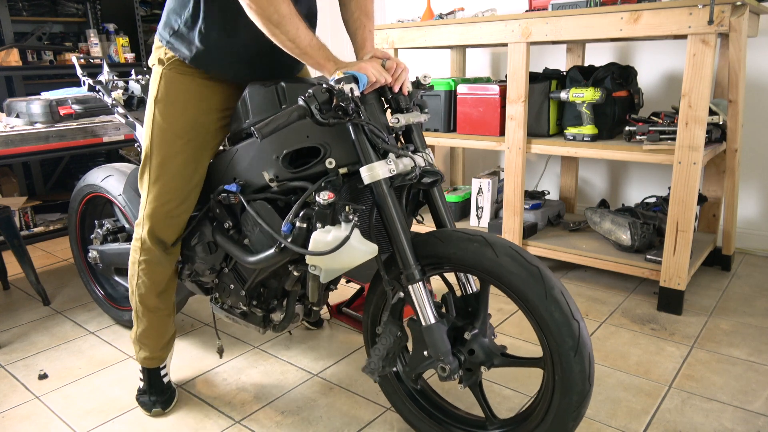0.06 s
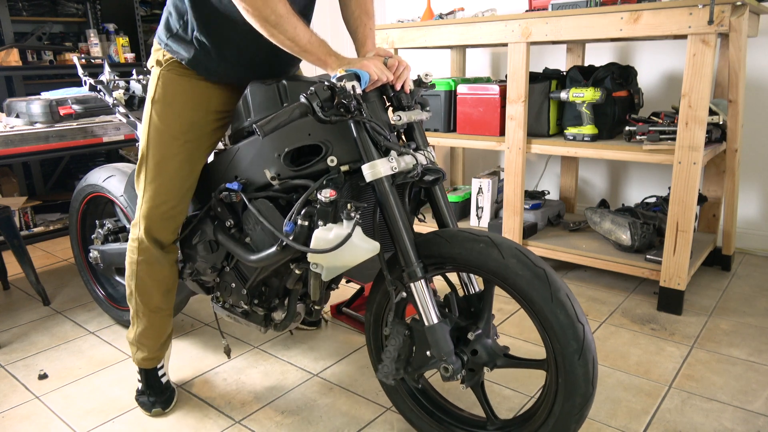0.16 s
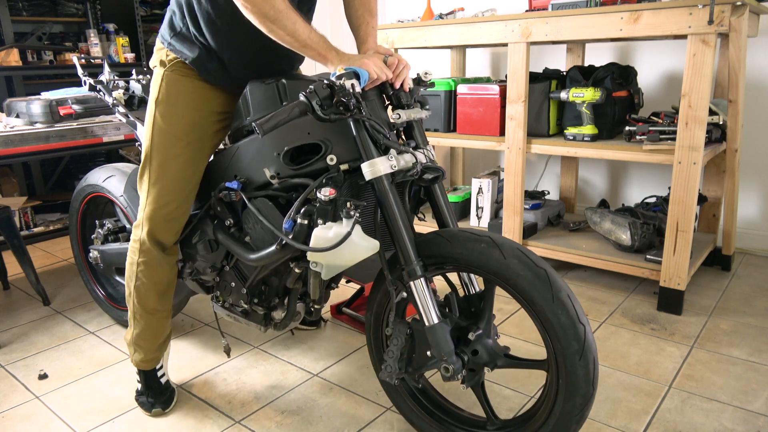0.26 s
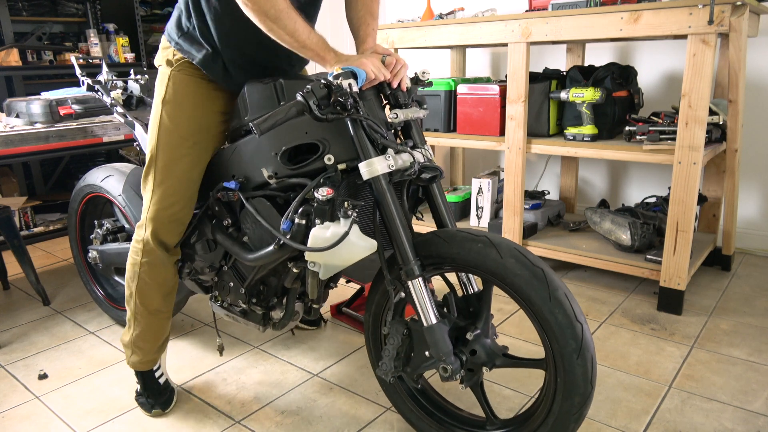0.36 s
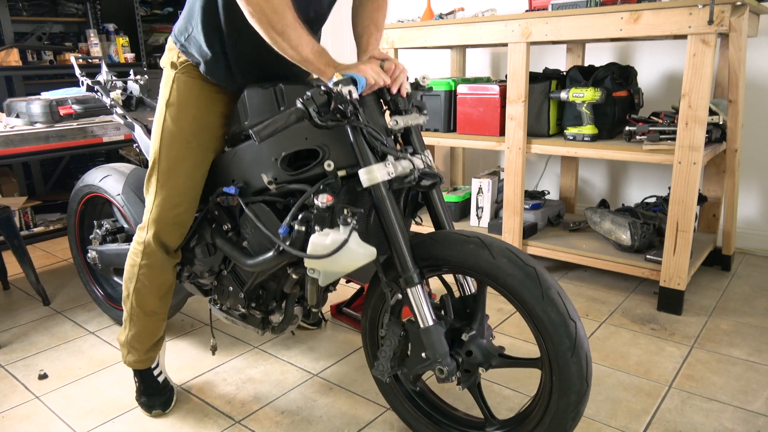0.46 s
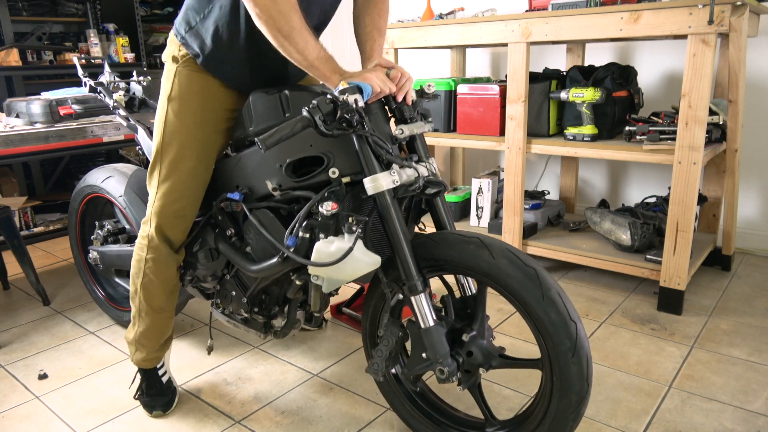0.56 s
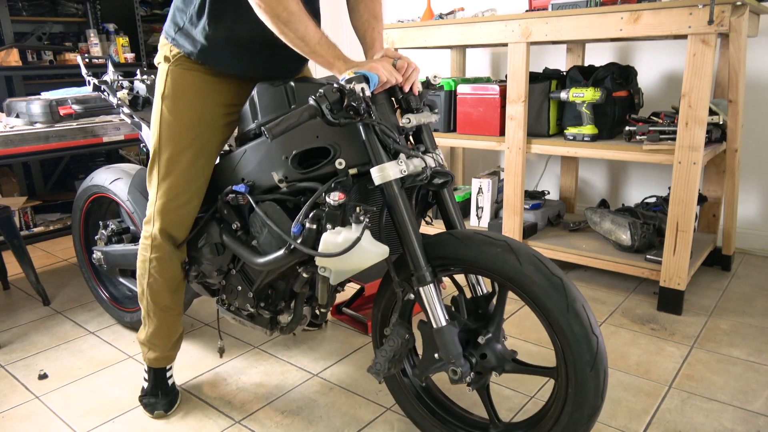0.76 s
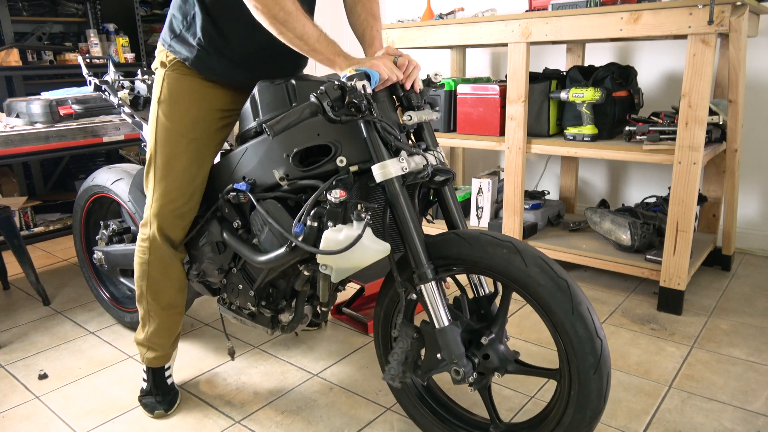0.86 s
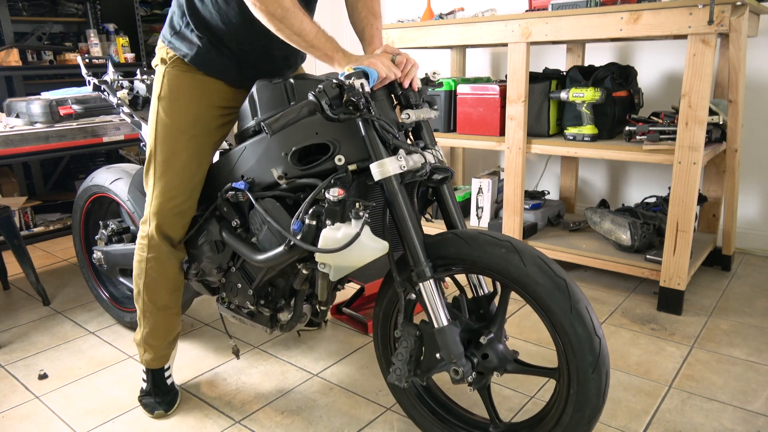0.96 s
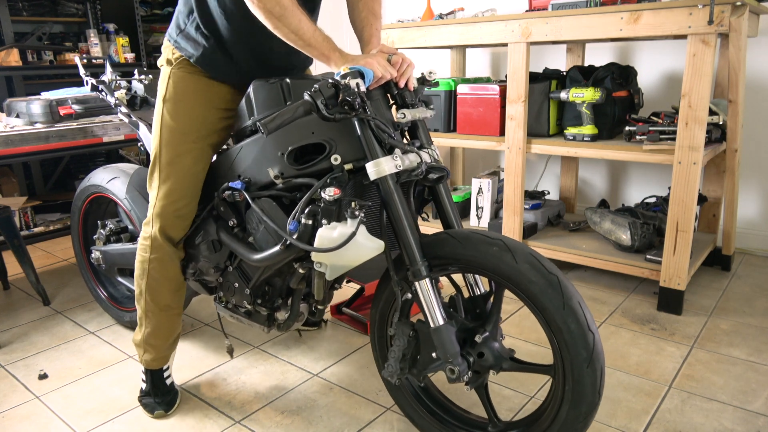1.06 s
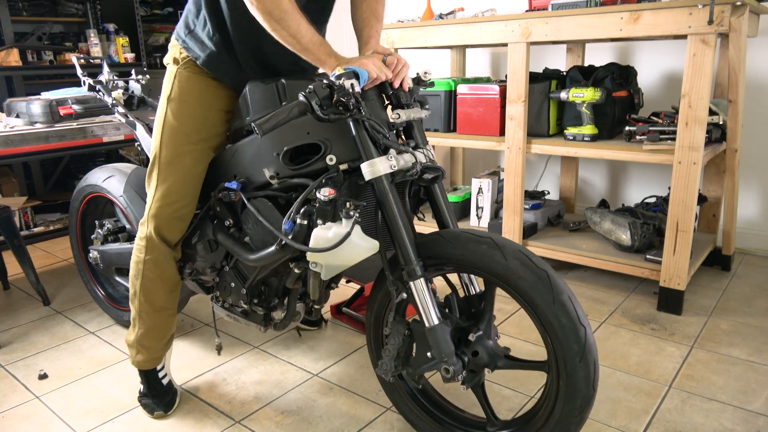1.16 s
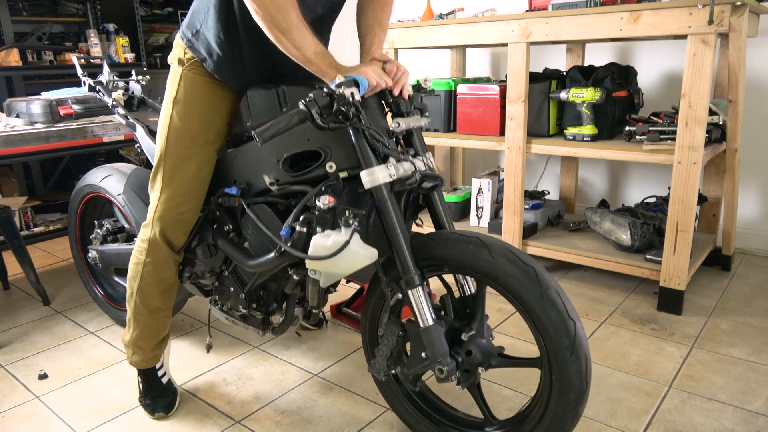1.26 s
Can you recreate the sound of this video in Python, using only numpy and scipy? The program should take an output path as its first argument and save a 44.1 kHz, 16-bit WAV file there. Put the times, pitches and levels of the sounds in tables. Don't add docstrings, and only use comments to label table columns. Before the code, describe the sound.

A motorcycle front end is pumped on its forks, giving two sharp metallic knock-clanks in a garage

```python
import sys
import numpy as np
from scipy import signal
from scipy.io import wavfile

SR = 44100
rng = np.random.default_rng(int(sys.argv[2]) if len(sys.argv) > 2 else 0)


def output_pcm(signal):
    pcm = np.clip(np.atleast_2d(signal).T, -1, 1) * 32767
    wavfile.write(sys.argv[1], SR, np.round(pcm).astype(np.int16))


def voltage_ratio(decibels):
    exponent = np.asarray(decibels, float) / 20
    return 10 ** exponent


N = 57330

# pitch_hz, level_db (rms)
HUM_TONES = [
    (52, -56),
    (73, -52.5),
]
# freq_hz, level_db (per Hz)
FLOOR_COLOUR = [(22, -11), (40, -4), (70, -4.5), (125, -13), (400, -19.5), (1000, -25), (5000, -22.5),
                (12000, -41), (16000, -44)]
# time_s, level_db
SLIDE_SPEED = [(0, -73), (.06, -65), (.12, -53.5), (0.182, -55.5), (.22, -75), (.33, -65), (.45, -52.5),
               (.55, -70), (0.618, -47.5), (.67, -54.5), (.73, -52), (.79, -62.5), (.9, -72), (1.051, -36),
               (1.16, -51), (1.23, -47), (1.3, -46)]
# freq_hz, level_db (per Hz)
SEAL_COLOUR = [(240, -36), (400, -1), (579, -7.5), (1220, -9), (1400, -8), (1510, -6.5), (5030, -4),
               (11900, -23.5), (16000, -34)]
# freq_hz, t60_s
ROOM_DECAY = [(150, 0.62), (500, 0.33), (1200, 0.33), (2500, 0.28), (5000, 0.29), (10000, 0.23),
              (16000, 0.067)]
# freq_hz, level_db
ROOM_TONE = [(150, -7), (500, 7.5), (1200, 10), (2500, 4), (5000, 12), (10000, 9), (16000, 1)]
# start_s, level_db, pitch_hz, swell_s
THUDS = [
    (0.097, -59, 268, 0.0048),
    (0.231, -39.5, 173, 0.0072),
    (.278, -36.5, 170, 0.0069),
    (0.494, -55.5, 223, 0.0033),
    (0.518, -50.5, 296, .006),
    (0.657, -44.5, 292, 0.0037),
    (.68, -56, 176, 0.0068),
    (0.731, -51.5, 123, .008),
    (0.939, -42, 172, .01),
    (0.995, -38, 181, 0.01),
]
# start_s, level_db
TICK_HITS = [
    (.5756, -29),
    (.5768, -35),
    (.5785, -32),
    (.5800, -40),
]
# pitch_hz, level_db, t60_s
CLIP_MODES = [(1600, -7, .01), (2200, -4, .007), (4500, -1, .006), (5150, -2, .007), (7300, -9, .005),
              (9000, -9, .005), (11500, -15, .004)]
# start_s, level_db
DISC_SHAKES = [
    (.2745, -43),
    (.9895, -42.5),
    (1.003, -51.5),
]
# pitch_hz, level_db, t60_s
DISC_MODES = [(10610, 0, .18), (10690, -2, .18), (12720, -5, .15)]
# start_s, level_db
KNOCK_HITS = [
    (.2267, -13),
    (.2290, -22),
    (.9347, -15),
    (.9372, -24.5),
]
# pitch_hz, level_db, t60_s
BRACKET_MODES = [(432, -9, 0.057), (736, -4.5, 0.014), (996, -6.5, 0.053), (1200, -7.5, 0.0067),
                 (1488, -10, 0.056), (1507, 5, 0.031), (1857, 4.5, 0.043), (2430, -1, 0.011),
                 (3080, -30, .006), (3464, -0.5, 0.0063), (4240, -11, 0.013), (4780, -9.5, 0.01),
                 (5530, -9.5, 0.0098), (6170, -17, 0.011)]
# freq_hz, level_db (per Hz)
KNOCK_CRACK_COLOUR = [(150, -44), (250, -20), (1180, -13), (1470, -1), (1700, -26), (1910, 11), (2130, -3),
                      (5830, -18), (16000, -95)]
KNOCK_CLATTER_COLOUR = [(150, -50), (250, -22), (802, -6.5), (988, 3), (1160, -27), (1450, -10.5),
                        (2160, -7.5), (5160, -15), (16000, -76)]
# start_s, level_db
CLANK_HITS = [
    (.2737, -4),
    (.2747, -13.5),
    (.2804, -14),
    (.2841, -16),
    (.9888, -6),
    (.9898, -10),
    (.9946, -15),
]
# pitch_hz, level_db, t60_s
FORK_MODES = [(369, -8.5, 0.015), (522, -10.5, 0.032), (761, -6, 0.019), (1044, -15, 0.024),
              (1529, 0.5, 0.029), (2100, 6.5, 0.0045), (2346, 5, 0.011), (3350, -3.5, 0.0096),
              (3694, -14.5, 0.017), (4830, -6.5, 0.0061), (6130, -14.5, 0.0075), (11800, -21.5, 0.0026)]
# freq_hz, level_db (per Hz)
CLANK_CRACK_COLOUR = [(150, -23), (250, 4), (1550, -5), (2810, -20), (3460, -4), (6360, -19), (8700, -26),
                      (12800, -28), (16000, -62)]
CLANK_CLATTER_COLOUR = [(150, -53), (250, -24.5), (875, -5), (1950, -9.5), (2810, -31.5), (3460, -9.5),
                        (6140, -21), (13000, -50), (16000, -58)]

ROOM_START_S, ROOM_BUILD_S = 0.0025, 0.0019


def rms_one(x):
    return x / np.sqrt(np.mean(x ** 2) + 1e-20)


def at_hz(points, hz):
    table_hz, value = np.transpose(points)
    return np.interp(np.log(hz), np.log(table_hz), value)


def drift(rate_hz):
    r = np.exp(-80 * np.pi * rate_hz / SR)
    noise = rng.standard_normal(N // 40 + 2002)
    slow = signal.lfilter([1], [1, -2 * r, r * r], noise)[2000:]
    return np.interp(np.arange(N) / 40, np.arange(len(slow)), rms_one(slow))


def bands():
    edges = 22 * 2 ** np.arange(0, 9.7, 1 / 3)
    white = rng.standard_normal((2, N + 8000))
    for k, (low, high) in enumerate(zip(edges, edges[1:])):
        band = signal.butter(2, [low, high], "band", fs=SR, output="sos")
        yield np.sqrt(low * high), signal.sosfilt(band, white[k % 2])[8000:]


def banded_noise(colour, patchy_db, lowest_hz):
    together = drift(1.3)
    out = np.zeros(N)
    for hz, band in bands():
        flicker_db = patchy_db * (0.75 * together + drift(36))
        if hz > lowest_hz:
            out += voltage_ratio(at_hz(colour, hz) + flicker_db) * band
    return rms_one(out)


def ring(clicks, hz, t60):
    r, w = voltage_ratio(-60 / (t60 * SR)), 2 * np.pi * hz / SR
    return signal.lfilter([0, np.sin(w)], [1, -2 * r * np.cos(w), r * r], clicks + 1e-18)


def struck(hits, modes, swell_cycles):
    start_s, hit_db = np.transpose(hits)
    spread_db = 1.5 * rng.standard_normal((len(start_s), 14))
    out = np.zeros(N)
    for k, (hz, mode_db, t60) in enumerate(modes):
        clicks = np.zeros(N)
        clicks[(start_s * SR).astype(int)] = -voltage_ratio(hit_db + mode_db + spread_db[:, k])
        swelling = ring(ring(clicks, hz, t60), hz, swell_cycles / hz)
        out += swelling * 2 * np.log(1000) * hz / (swell_cycles * SR)
    return out


def since_hits(hits, delay_s=0):
    start_s, level_db = np.array(hits).T[:, :, None]
    return np.maximum(np.arange(N) / SR - start_s - delay_s, 0), level_db


def crack(hits, colour, level_db):
    age, hit_db = since_hits(hits)
    rise_s, fall_s = .0004, .0016
    shape = voltage_ratio(hit_db) * (1 - np.exp(-age / rise_s)) * np.exp(-age / fall_s)
    return voltage_ratio(level_db) * shape.sum(axis=0) * banded_noise(colour, patchy_db=2.5, lowest_hz=200)


def clatter(hits, colour, level_db):
    age, hit_db = since_hits(hits, ROOM_START_S)
    build = voltage_ratio(2 * hit_db) * (1 - np.exp(-age / ROOM_BUILD_S)) ** 2
    out = np.zeros(N)
    for hz, band in bands():
        if hz > 200:
            power = (build * voltage_ratio(-120 * age / at_hz(ROOM_DECAY, hz))).sum(axis=0)
            out += voltage_ratio(at_hz(colour, hz)) * band * np.sqrt(power)
    total = sum(voltage_ratio(2 * at_hz(colour, hz)) * hz for hz in np.geomspace(200, 16000, 20))
    return voltage_ratio(level_db) / np.sqrt(total / SR) * out


def no_bass(x):
    return signal.sosfilt(signal.butter(3, 260, "high", fs=SR, output="sos"), x)


def garage(x):
    t = np.maximum(np.arange(N) / SR - ROOM_START_S, 0)
    tail = np.zeros(N)
    for hz, band in bands():
        tail += voltage_ratio(at_hz(ROOM_TONE, hz) - 60 * t / at_hz(ROOM_DECAY, hz)) * band
    tail *= 1 - np.exp(-t / ROOM_BUILD_S)
    return voltage_ratio(-3.5) * signal.fftconvolve(x, tail / np.sqrt(np.sum(tail ** 2)))[:N]


def room_floor():
    return voltage_ratio(-50.5) * banded_noise(FLOOR_COLOUR, patchy_db=.8, lowest_hz=20)


def hum():
    out = np.zeros(N)
    for hz, db in HUM_TONES:
        level = np.sqrt(2) * voltage_ratio(db + 1.0 * drift(3.5))
        pitch_hz = hz + 1.0 * drift(6.9)
        out += level * np.sin(2 * np.pi * np.cumsum(pitch_hz) / SR)
    return out


def seal_hiss():
    slide_db = np.interp(np.arange(N) / SR, *np.transpose(SLIDE_SPEED))
    return voltage_ratio(slide_db) * banded_noise(SEAL_COLOUR, patchy_db=.6, lowest_hz=350)


def chassis_thuds():
    out, t = np.zeros(N), np.arange(N) / SR
    for start_s, db, hz, swell_s in THUDS:
        age = np.maximum(t - start_s, 0) / swell_s
        out += voltage_ratio(db) * age * np.exp(1 - age) * np.sin(2 * np.pi * hz * (t - start_s))
    return out


def rebound_tick():
    return struck(TICK_HITS, CLIP_MODES, swell_cycles=4.6)


def disc_ring():
    return struck(DISC_SHAKES, DISC_MODES, swell_cycles=7.3)


def hit_clatter():
    knock = clatter(KNOCK_HITS, KNOCK_CLATTER_COLOUR, level_db=-5.0)
    return knock + clatter(CLANK_HITS, CLANK_CLATTER_COLOUR, level_db=-12.5)


def hit_cracks():
    knock = crack(KNOCK_HITS, KNOCK_CRACK_COLOUR, level_db=-0.5)
    return no_bass(knock + crack(CLANK_HITS, CLANK_CRACK_COLOUR, level_db=-9.0))


def knocks_and_clanks():
    knock = struck(KNOCK_HITS, BRACKET_MODES, swell_cycles=6.5)
    return no_bass(knock + struck(CLANK_HITS, FORK_MODES, swell_cycles=13.9))


def scene():
    metal = knocks_and_clanks()
    cracks = hit_cracks()
    metal = metal + disc_ring()
    tails = hit_clatter()
    tick, thuds = rebound_tick(), chassis_thuds()
    direct = metal + cracks + tails + tick + thuds
    background = seal_hiss() + room_floor()
    reflections = garage(metal + thuds + voltage_ratio(-6.0) * tick)
    return (direct + reflections + background + hum())[None]


def band_limit(x):
    return signal.sosfilt(signal.butter(12, 16430, fs=SR, output="sos"), x)


def record(dry):
    soft = dry / (1 + (dry / 1.15) ** 4) ** .25
    top_cut = signal.cheby2(12, 60, 16500, fs=SR, output="sos")
    finished = signal.sosfilt(top_cut, soft)
    return band_limit(finished)


dry = scene()
out = record(dry)
output_pcm(out)
```